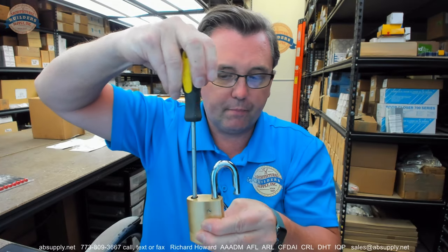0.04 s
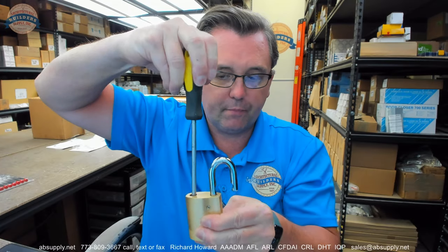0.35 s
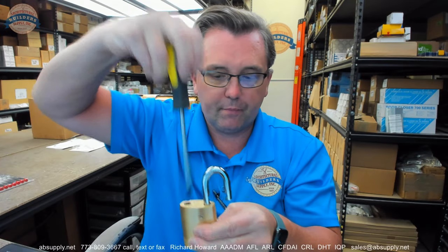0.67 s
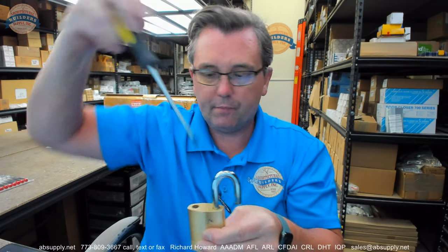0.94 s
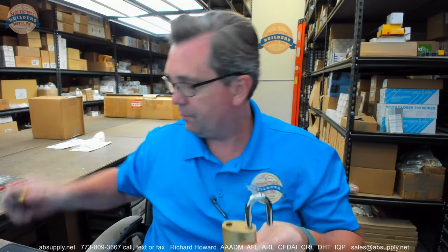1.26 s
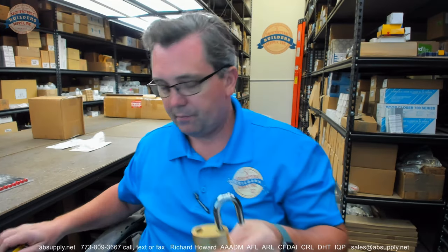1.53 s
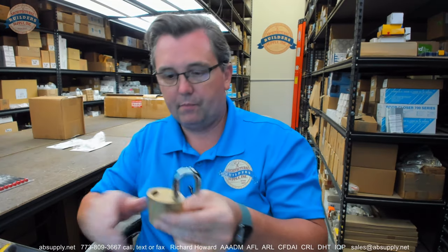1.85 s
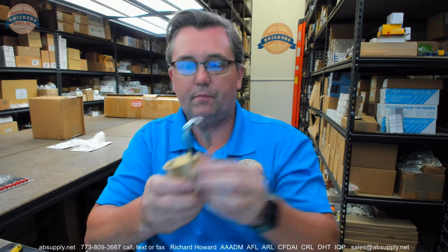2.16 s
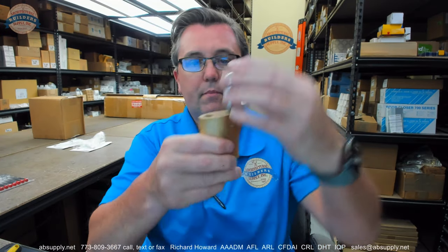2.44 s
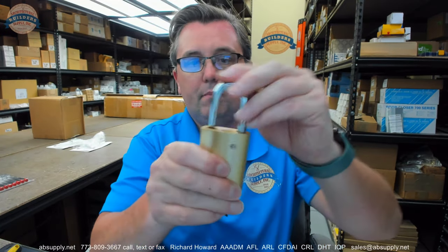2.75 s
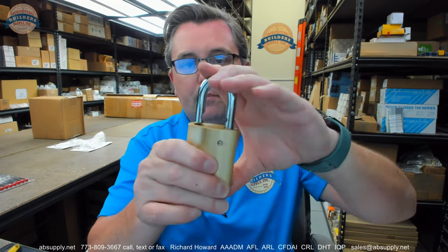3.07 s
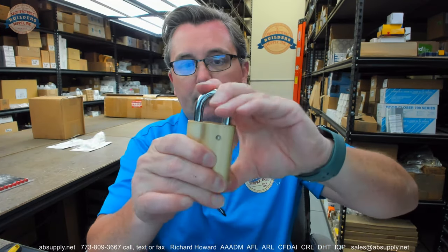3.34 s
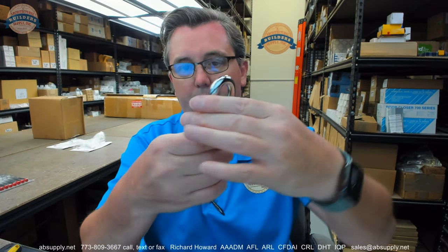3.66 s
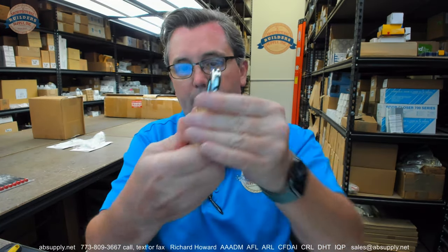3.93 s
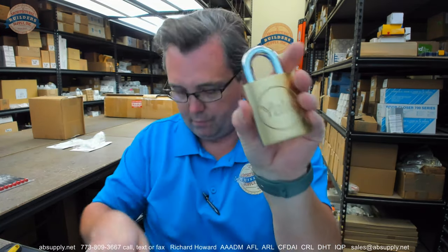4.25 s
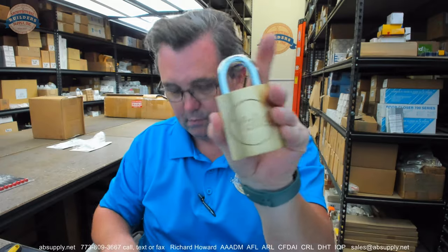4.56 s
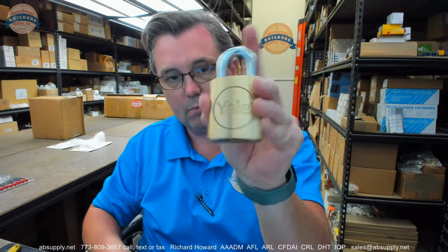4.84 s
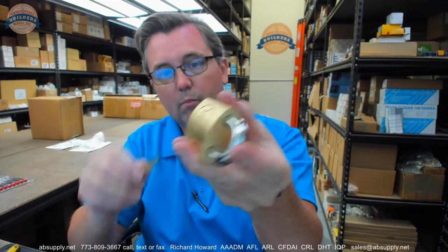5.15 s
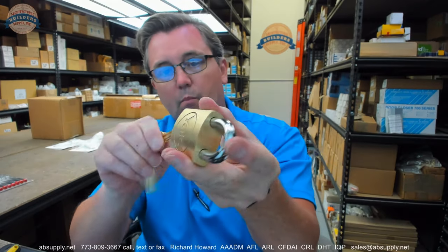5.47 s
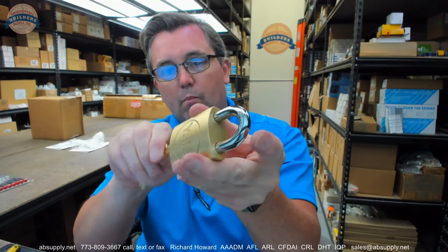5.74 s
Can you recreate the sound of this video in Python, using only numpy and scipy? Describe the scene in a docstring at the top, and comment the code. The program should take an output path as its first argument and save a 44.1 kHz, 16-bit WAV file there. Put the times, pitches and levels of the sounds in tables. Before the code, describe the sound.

Steady low air noise, mains hum and a faint electrical buzz run throughout in a stockroom with little echo. At about 0.7 seconds a screwdriver blade slips out of a brass padlock with a light, ringing click. Sleeves rustle faintly, and at 1.5 seconds the screwdriver is put down, making the workbench boom dully. At about 3.2 seconds the shackle snaps shut close by: a quick metallic rattle, then a sharp crack with a short bright ring, the sharpest sound here. Two light knocks on the lock body follow near 3.4 and 3.9 seconds, with faint rubbing of skin. At 4.5 seconds a hand thumps the bench more softly and drags a key off it, with small high clinks until about 5 seconds. From 5.5 seconds the key goes into the keyway with several small clicks, clearest near 5.8, and a last one at 6 seconds.

```python
"""A brass padlock at a stockroom workbench, over steady air noise, mains hum and a faint electrical buzz.
A screwdriver clicks out of the lock (0.7 s) and is put down, setting the bench top booming (1.5 s).
The shackle snaps shut with a crack and a ring (3.2 s); two light knocks on the lock body follow.
A hand thumps the bench and drags a clinking key off it (4.5 s); the key clicks into the keyway (5.5 s).
Hands and sleeves rustle in between."""
import sys
import numpy as np
from scipy import signal
from scipy.fft import rfft, irfft
from scipy.io import wavfile
from scipy.ndimage import uniform_filter1d

SR = 44100
rng = np.random.default_rng(int(sys.argv[2]) if len(sys.argv) > 2 else 0)


def put_to_file(sound):
    """Save the sound as 16-bit audio at rate SR, in the file named by the first command-line argument."""
    columns = np.atleast_2d(sound).T  # one column per channel
    safe = np.clip(columns, -1, 1)
    whole_steps = np.round(safe * 32767)
    wavfile.write(sys.argv[1], SR, whole_steps.astype(np.int16))


N = 264644
TIME = np.arange(N) / SR
CUTOFF_HZ = 15800


def padlock():
    """Shackle strikes home, latch snaps, body is knocked; all ring the same modes."""
    # contacts: t/s, level/dB, tilt/(dB/oct), ring/dB
    shackle_hits = [(3.1677, -26, 0.83, -34), (3.171, -34.5, -1.6, -15.5), (3.176, -32, 1.8, -24.5),
                    (3.1798, -32, 0.2, -18.5), (3.2248, -36.5, 0, -22), (3.228, -31.5, 0.39, -18)]
    latch_hits = [(3.2308, -8, 0.11, -26), (3.2335, -17.5, 1, -27.5)]
    body_hits = [(3.433, -43, -4.5, -29), (3.4344, -28.5, -0.5, -39), (3.88, -52, 5, -21)]
    # crack spectra: f/Hz, level/dB
    shackle_crack = [(300, -23.5), (1200, -17.5), (1700, 2), (2200, -9.5), (3500, -7.5), (4900, 0.5),
                     (5600, -12.5), (6400, 2), (10000, -10), (11000, -2), (13200, -1), (16000, -16.5)]
    latch_crack = [(200, -19.5), (350, -25.5), (470, -20.5), (650, -18), (1000, -24.5), (1400, -13.5),
                   (1900, -27), (3000, -8.5), (3500, -18.5), (4400, -20), (5000, -10), (5700, -16.5),
                   (6300, -3), (7000, -10.5), (8300, -11), (9400, -20.5), (11250, 1), (12000, -13.5),
                   (13100, -10.5), (15500, -23)]
    body_crack = [(200, -18), (700, -12), (1200, -5), (1600, -11.5), (2300, -2), (4200, 1.5), (5200, -1.5),
                  (7000, 3.5), (10000, -8.5), (12300, -3), (16000, -14)]
    # lock modes: f/Hz, level/dB, t60/s
    modes = [(1980, -18, 0.23), (3110, -2, 0.087), (5890, -9, 0.23), (6306, -1.5, 0.071), (6120, -8.5, .17),
             (7200, -16.5, 0.167), (7350, -10.5, .18), (8400, -14, 0.14), (10500, 0, 0.084),
             (11170, -6.5, .17), (11530, -5.5, 0.057), (11600, -12.5, .15), (12990, -12.5, .16)]
    shackle = contacts(shackle_hits, shackle_crack, modes, crack_t60_s=0.015, snap=0.46, blur_hz=80.15)
    latch = contacts(latch_hits, latch_crack, modes, crack_t60_s=0.019, snap=0.094, blur_hz=49.2)
    body = contacts(body_hits, body_crack, modes, crack_t60_s=0.017, snap=0.15, blur_hz=79.9)
    return shackle + latch + body


def bench(tick_t60_s, swell_share, size=22050):
    """Blows set the bench top booming; longer contact gives a duller boom and a fainter tick."""
    # screwdriver, then hand: t/s, level/dB, contact/s
    blows = [(1.546, -25, 0.00078), (1.552, -9.5, 0.0018), (1.5702, -12.5, 0.0024), (1.5901, -14, 0.0024),
             (1.6228, -10, 0.0048), (4.514, -16, 0.0047), (4.583, -28, 0.00083), (4.6037, -19, 0.0036),
             (4.763, -33, .001), (4.797, -33, 0.0014)]
    # bench top modes: f/Hz, level/dB, t60/s
    modes = [(30, -32, 0.67), (70.4, -21, 0.5), (139, -7, 0.06), (153.4, 2.5, 0.11), (181, -34.5, 0.087),
             (274, -14, 0.06), (318, -30.5, 0.14)]
    # tick spectrum: f/Hz, level/dB
    tick_spectrum = [(300, -4), (700, 0), (1500, -1), (2500, -7), (3600, -24), (12000, -45)]
    out, t, boom = np.zeros(N), TIME[:size], 0
    for hz, db, t60_s in modes:
        swell = 1 - decay(t, swell_share * t60_s)  # the wide top takes a few cycles to swing fully
        boom += from_db(db) * decay(t, t60_s) * swell * np.sin(2 * np.pi * hz * t)
    for start_s, level_db, contact_s in blows:
        force = t * np.exp(-np.pi * t / contact_s)
        thump = signal.fftconvolve(boom, force / force.sum())[:size]
        tick_db = -30 - 24 * np.log2(contact_s / 0.001)  # re a hard 1 ms contact
        tick = colour(rattle(decay(t, tick_t60_s)), tick_spectrum)
        add(out, start_s, from_db(level_db) * (thump + from_db(tick_db) * tick))
    return out


def screwdriver():
    """The blade clicks and rings as it slips out of the lock."""
    # contacts: t/s, level/dB, tilt/(dB/oct), ring/dB
    hits = [(.6575, -60, -4, -24), (.6617, -40.5, 3.5, -30), (.6824, -36.5, 2, -26),
            (.6948, -41.5, -1, -30)]
    # crack spectrum: f/Hz, level/dB
    crack = [(300, -3), (800, -22), (1600, 1.5), (2500, -3), (3200, 5.5), (3800, -8), (5000, 1.5),
             (7500, -4.5), (10000, -14), (16000, -22)]
    # blade modes: f/Hz, level/dB, t60/s
    modes = [(1680, -14, 0.074), (3220, -6, 0.08), (4480, 6, 0.17), (5200, 6, 0.087)]
    return contacts(hits, crack, modes, crack_t60_s=0.024, snap=0.24, blur_hz=80)


def keyway():
    """The key clicks into the lock, ringing only briefly."""
    # contacts: t/s, level/dB, tilt/(dB/oct), ring/dB
    hits = [(5.463, -45.5, -2, -1), (5.6275, -49.5, -8, -22), (5.7503, -40.5, -2, 7),
            (5.7548, -36.5, 6.5, 2), (5.7597, -43, 0.5, -15), (5.7672, -51, 14, -20), (5.989, -39, 1, -20)]
    # crack spectrum: f/Hz, level/dB
    crack = [(300, -21), (1100, -12.5), (2350, 1), (3000, -6.5), (3500, -12.5), (4400, -7), (5100, -9.5),
             (6100, -11), (7000, -10), (8000, -19.5), (9000, -20), (10700, -15.5), (13000, -10),
             (16000, -34)]
    # keyway modes: f/Hz, level/dB, t60/s
    modes = [(2300, 0, .028), (6950, -10, .022), (12950, -14, .07)]
    return contacts(hits, crack, modes, crack_t60_s=0.015, snap=0.22, blur_hz=99.5)


def loose_key():
    """The key clinks on the bench as it is picked up."""
    # contacts: t/s, level/dB, tilt/(dB/oct), ring/dB
    hits = [(4.551, -65, 0, -6), (4.576, -62, 5, 10), (4.584, -46.5, 7, -6.5), (4.595, -53.5, -2, -20),
            (4.709, -64, 6, -9), (4.756, -64, -4, -4), (4.784, -48.5, 1.5, -22), (4.7905, -47.5, -1, -17),
            (4.927, -69, 1, -2), (4.974, -67, 0, -2)]
    # crack spectrum: f/Hz, level/dB
    crack = [(500, -29), (2500, -1.5), (6200, -3), (7200, 9.5), (8500, 2.5), (10500, -20), (12300, -11),
             (13300, 2), (16000, -20)]
    # key modes: f/Hz, level/dB, t60/s
    modes = [(7200, 0, .13), (7900, -9, .08), (13000, -8, .18), (13550, -6, .15)]
    return contacts(hits, crack, modes, crack_t60_s=0.033, snap=0.088, blur_hz=40)


def key_pings(hz, t60_s):
    """Thin, pure ring of the key's bending mode, struck where it is free to ring."""
    # knocks: t/s, level/dB
    knocks = [(4.791, -58.5), (5.463, -60), (5.756, -60)]
    out = np.zeros(N)
    ping = decay(TIME, t60_s) * np.sin(2 * np.pi * hz * TIME)
    for start_s, level_db in knocks:
        add(out, start_s, from_db(level_db) * ping)
    return out


def contacts(hits, crack, modes, crack_t60_s, snap, blur_hz, size=16384):
    """Metal contacts: a sharp snap and a dense, hand-damped crack over modes that ring on."""
    out, t = np.zeros(N), TIME[:size]
    hz, mode_db, t60_s = np.transpose(modes)[:, :, None]
    tones = from_db(mode_db) * decay(t, t60_s) * np.exp(2j * np.pi * hz * t)
    pole = np.exp(-np.pi * blur_hz / SR)
    for start_s, level_db, tilt_db_oct, ring_db in hits:
        burst = rattle(decay(t, crack_t60_s) + snap * decay(t, 0.003))
        # loose parts and reflections scatter each mode's level and phase
        phasors = rng.choice([1, -1, 1j, -1j], tones.shape)
        scatter = signal.lfilter([np.sqrt(1 - pole ** 2)], [1, -pole], phasors)
        ringing = from_db(ring_db) * (scatter * tones).real.sum(0)
        add(out, start_s, from_db(level_db) * (colour(burst, crack, tilt_db_oct) + ringing))
    return out


def rattle(envelope, smooth_bins=200):
    """Burst of dense vibration, energy spread evenly over frequency."""
    spectrum = rfft(rng.choice([-1, 1], len(envelope)) * envelope)
    power = uniform_filter1d(np.abs(spectrum) ** 2, smooth_bins)
    burst = irfft(spectrum / np.sqrt(power))
    burst *= np.minimum(1, from_db(30) * envelope)  # fade the tail
    return burst * np.linalg.norm(envelope) / np.linalg.norm(burst)


def hands():
    """Sleeves and skin rub; fingers drag the key over the bench top."""
    # strokes: peak t/s, length/s, peak level/dB
    sleeve_strokes = [(.822, 0.11, -65.5), (.938, 0.11, -67), (1.17, 0.45, -69.5), (2.13, 0.5, -73),
                      (2.45, 0.99, -73), (4.25, .12, -70.5)]
    skin_strokes = [(1.06, .2, -74), (2.07, 0.17, -72), (2.215, .1, -70), (3.96, 0.23, -66),
                    (4.015, 0.051, -63), (5.23, 0.13, -71)]
    drag_strokes = [(4.597, 0.075, -54), (4.79, 0.098, -53.5)]
    # friction spectra: f/Hz, level/dB
    sleeve_spectrum = [(300, -12), (800, 5.5), (1800, 2.5), (3000, -4), (7000, -7), (16000, -22.5)]
    skin_spectrum = [(1500, -17.5), (4000, -5), (7000, 1), (11000, -1), (15000, -2)]
    drag_spectrum = [(150, -14.5), (280, 3), (380, -1), (520, -10.5), (700, -15), (1100, -26), (3000, -34)]
    sleeve = rubbing(sleeve_strokes, sleeve_spectrum, rise_share=0.46, grain_db=1)
    skin = rubbing(skin_strokes, skin_spectrum, rise_share=0.5, grain_db=2)
    drag = rubbing(drag_strokes, drag_spectrum, rise_share=0.72, grain_db=2)
    return sleeve + skin + drag


def rubbing(strokes, spectrum, rise_share, grain_db, edge_drop_db=13):
    """Friction hiss: swells and fades linearly in dB with each stroke, catching unevenly."""
    power = 0
    for peak_s, length_s, peak_db in strokes:
        from_peak = np.maximum((peak_s - TIME) / rise_share, (TIME - peak_s) / (1 - rise_share))
        power += from_db(peak_db - edge_drop_db * np.minimum(from_peak / length_s, 10)) ** 2
    return np.sqrt(power) * from_db(grain_db * drift(90)) * noise(spectrum)


def stockroom(x, build_s, size=22050):
    """Diffuse reflections off shelves and boxes: quick build-up, bass lasts longest."""
    # reverberation: f/Hz, t60/s
    room_t60 = [(200, .4), (1500, 0.16), (5000, 0.17), (15000, 0.2)]
    t, tail = TIME[:size], 0
    edges_hz = np.geomspace(100, 17000, 9)
    for low, high in zip(edges_hz, edges_hz[1:]):
        bandpass = signal.butter(2, [low, high], "band", fs=SR, output="sos")
        band = signal.sosfilt(bandpass, rng.standard_normal(size))
        tail += band * decay(t, at_hz(room_t60, np.sqrt(low * high)))
    tail *= 1 - np.exp(-t / build_s)
    return signal.fftconvolve(x, tail / np.linalg.norm(tail))[:N]


def hum(waver):
    """Low machine and mains tones, wavering slightly in level and phase."""
    # tones: f/Hz, rms level/dB
    tones = [(58.5, -61), (119.95, -53), (240, -78.5), (272, -84), (462, -74.5)]
    out = np.zeros(N)
    for hz, db in tones:
        amplitude = np.sqrt(2) * from_db(db) * (1 + waver * drift(20))
        out += amplitude * np.sin(2 * np.pi * hz * TIME + waver * drift(7.7))
    return out


def air():
    """Steady room noise, mostly rumble; rms 1."""
    # noise spectrum: f/Hz, level/dB
    spectrum = [(20, 5.5), (45, -5.5), (80, -3), (150, 1.5), (220, -10), (330, -12), (460, -10.5),
                (560, -18.5), (1200, -19), (1700, -28), (3000, -34), (6000, -36), (10000, -39.5),
                (16000, -44.5)]
    return noise(spectrum)


def buzz(uneven_db, smear_rad, pulse_hz=119.948, ring_hz=5300, ring_half_width_hz=480, size=2048):
    """One electrical spike per mains half-cycle, smeared in time outside its ringing band; rms 1."""
    # outline of the harmonics: f/Hz, level/dB
    outline = [(1000, -12), (1900, -11.5), (2900, -17), (3500, -14), (4300, -12.5), (5400, -9.5),
               (5900, -16.5), (7200, -16), (9000, -20.5), (12000, -17), (13500, -15.5), (15700, -25.5)]
    # strongest lines: f/Hz, relative level/dB
    lines = [(3241, -87), (3596, -88), (3720, -83), (4081, -83.5), (4436, -84), (4560, -86.5), (4797, -89),
             (4920, -81.5), (5039, -88), (5157, -84.5), (5276, -79), (5399, -82.5), (5518, -90.5),
             (5636, -90), (5760, -84), (8274, -91.5), (10314, -92), (10794, -92.5), (11154, -94.5),
             (11515, -93.5), (13313, -94), (13437, -92.5)]
    hz = np.arange(size // 2 + 1) * pulse_hz
    uneven, smear = rng.standard_normal((2, len(hz)))
    level_db = at_hz(outline, hz) + uneven_db * uneven
    top_db = max(db for _, db in lines)
    for line_hz, line_db in lines:
        level_db[round(line_hz / pulse_hz)] = line_db - top_db
    phase_rad = smear_rad * smear * (np.abs(hz - ring_hz) > ring_half_width_hz)
    in_band = (hz > outline[0][0]) & (hz < CUTOFF_HZ)
    spike = irfft(from_db(level_db) * in_band * np.exp(1j * phase_rad))
    train = np.interp(TIME * pulse_hz, np.arange(size) / size, spike, period=1)
    return train / np.sqrt(np.mean(train ** 2))


def from_db(db):
    """Decibels to gain."""
    return 10 ** (np.asarray(db) / 20)


def at_hz(points, hz):
    """Read a table on a log-frequency axis."""
    freqs_hz, values = np.transpose(points)
    return np.interp(np.log(np.maximum(hz, 1)), np.log(freqs_hz), values)


def decay(t, t60_s):
    """Envelope losing 60 dB in t60_s."""
    return np.exp(-np.log(1000) * t / t60_s)


def add(out, start_s, sound):
    """Mix a sound in at start_s."""
    start = round(start_s * SR)
    out[start:start + len(sound)] += sound[:N - start]


def colour(x, spectrum, tilt_db_oct=0, size=4096):
    """Minimum-phase filter with the given spectrum and unit power gain."""
    hz = np.arange(size // 2 + 1) * SR / size
    level_db = at_hz(spectrum, hz) + tilt_db_oct * np.log2(np.maximum(hz, spectrum[0][0]))
    cepstrum = irfft(np.log(from_db(level_db)))[:size // 2]
    response = irfft(np.exp(rfft(2 * cepstrum, size)))
    return signal.fftconvolve(x, response / np.linalg.norm(response))[:len(x)]


def noise(spectrum):
    """Coloured noise, rms 1."""
    return colour(rng.standard_normal(N), spectrum)


def drift(rate_hz, count=600):
    """Random wavering, spread about 1."""
    return np.interp(TIME * rate_hz, np.arange(count), rng.standard_normal(count))


def scene():
    """Lock, tools and bench in the room, over its steady background."""
    background = from_db(-58.5) * air() + hum(waver=0.099)
    background += from_db(-70.5) * buzz(uneven_db=2.9, smear_rad=1.5)
    blade, lock, key, key_in_lock = screwdriver(), padlock(), loose_key(), keyway()
    thumps = bench(tick_t60_s=0.01, swell_share=0.97)
    pings = key_pings(hz=5830, t60_s=0.13)
    near, tools = lock + key_in_lock, blade + key
    # what is held close carries less room sound
    send = from_db(-19.5) * near + from_db(-17.5) * tools + from_db(-16.5) * thumps
    room = stockroom(send, build_s=0.0032)
    return (near + tools + thumps + pings + room + hands() + background)[None]


def record(dry):
    """Steep low-pass at CUTOFF_HZ."""
    return signal.sosfilt(signal.ellip(10, .1, 80, CUTOFF_HZ, fs=SR, output="sos"), dry)


dry = scene()
out = record(dry)
put_to_file(out)
```